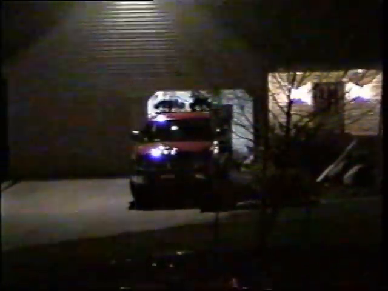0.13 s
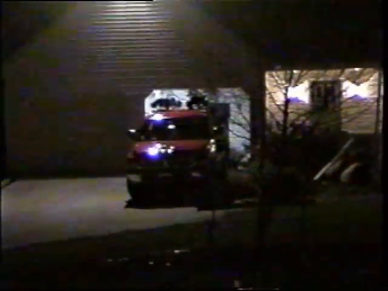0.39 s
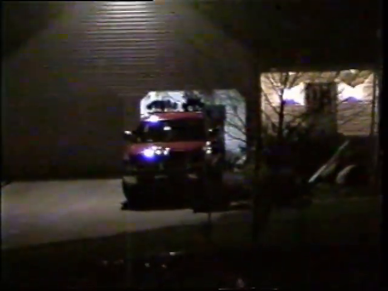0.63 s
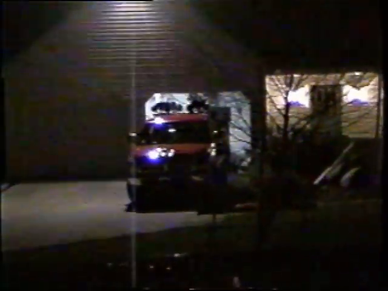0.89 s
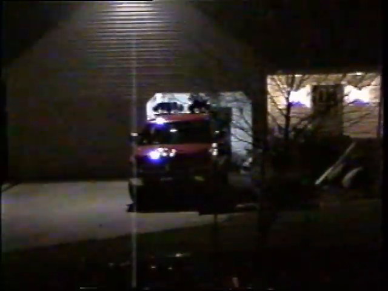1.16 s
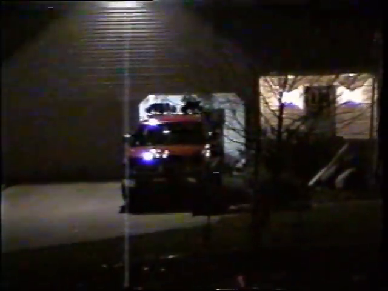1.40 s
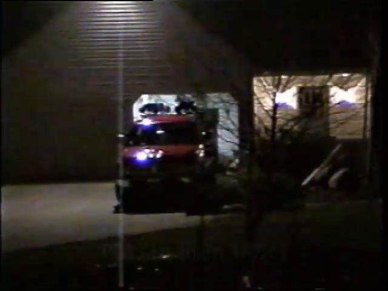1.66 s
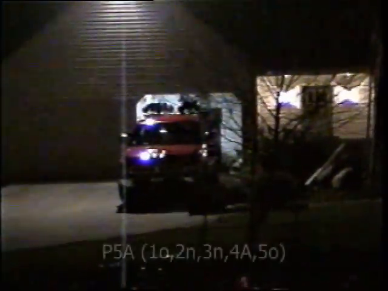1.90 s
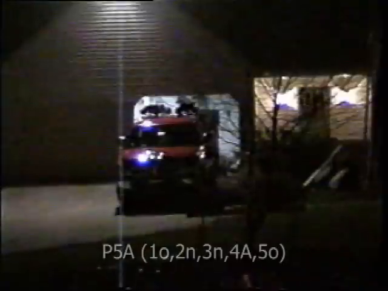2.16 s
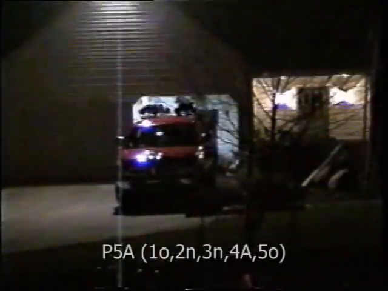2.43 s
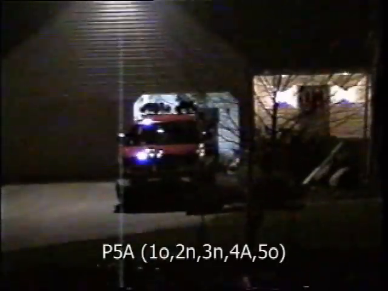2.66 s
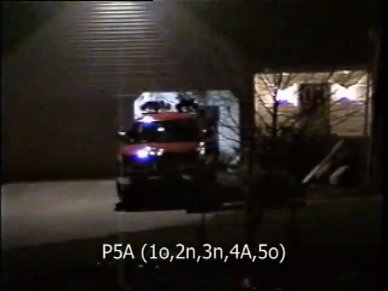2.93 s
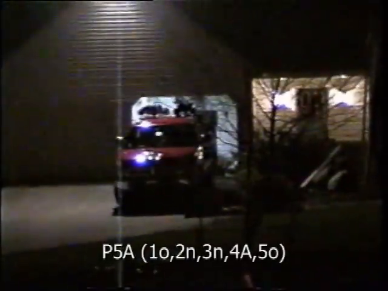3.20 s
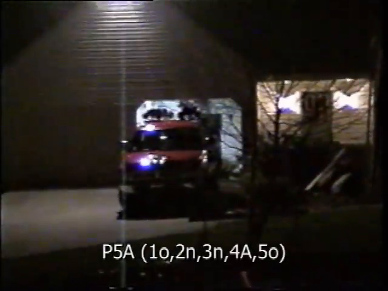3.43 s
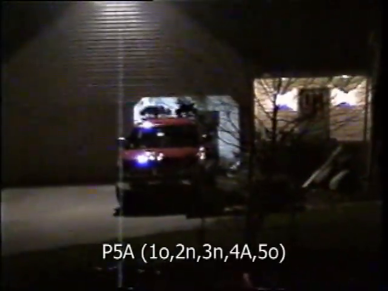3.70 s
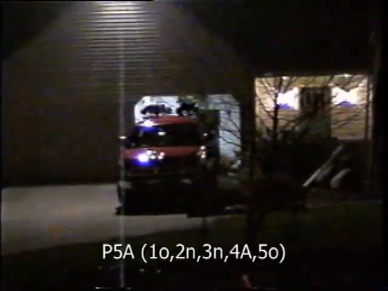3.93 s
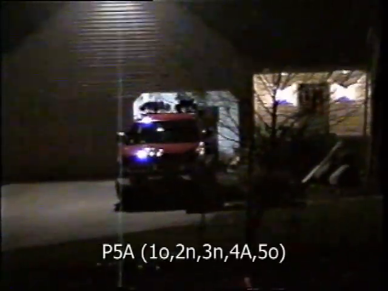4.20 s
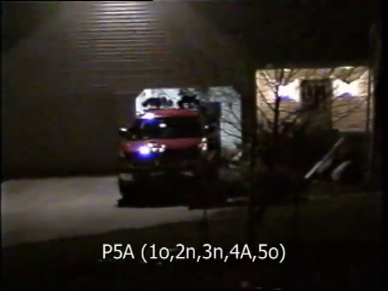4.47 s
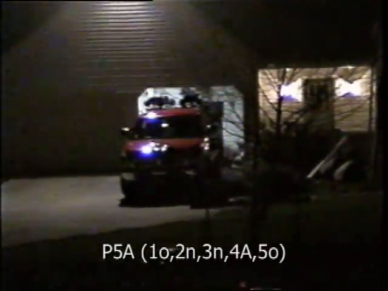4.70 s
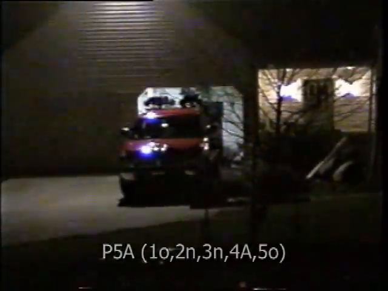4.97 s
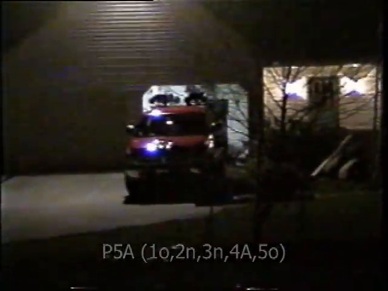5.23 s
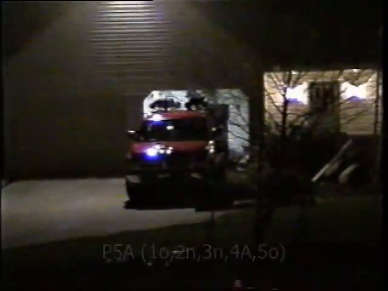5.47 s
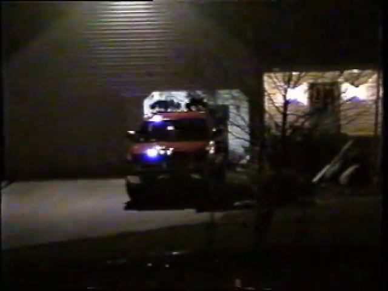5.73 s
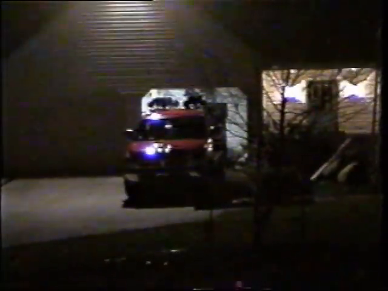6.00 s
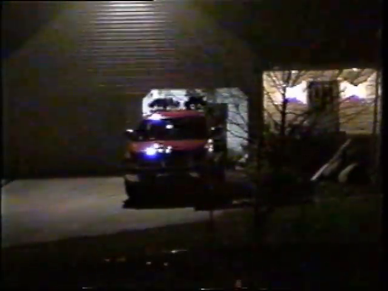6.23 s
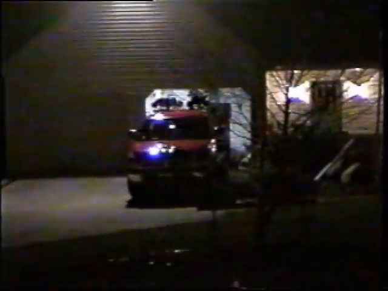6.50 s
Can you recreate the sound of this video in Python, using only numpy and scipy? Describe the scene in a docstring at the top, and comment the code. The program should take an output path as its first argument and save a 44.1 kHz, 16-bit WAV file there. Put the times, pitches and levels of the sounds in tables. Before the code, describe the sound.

Outdoors at night, a five-bell air horn blares from a pickup some distance from a tape camcorder. The opening chord grows from thin to full and cuts off quickly. Four more blasts follow: long, long, very short, long, each squeaking before the bells speak one after another. Faint diffuse echoes linger between them above hiss and hum. Tiny low thuds mark the squeals, and sharp tape clicks pepper the final blast, which continues to the end.

```python
"""A five-bell air horn on a parked pickup sounds five blasts, some way from a tape camcorder.
The first is under way and swells as its valve eases open; the last runs past the end.
Bells are sums of overtones plus sum tones and air rush; each later blast opens with a squeal of gliding tones.
Houses return a faint echo through sparse decaying taps. The tape adds hiss, hum, rumble, thuds, ticks, whine."""
import sys
import numpy as np
from scipy import signal
from scipy.fft import rfft, irfft, next_fast_len
from scipy.io import wavfile
from scipy.ndimage import uniform_filter1d

SR = 44100
rng = np.random.default_rng(int(sys.argv[2]) if len(sys.argv) > 2 else 0)


def inscribe(sig):
    """Save sig as 16-bit PCM at rate SR to the path in sys.argv[1].

    A 1-D sig is mono; a 2-D sig holds one channel per row.
    Samples are clipped to [-1, 1] before scaling.
    """
    pcm = np.round(np.clip(np.atleast_2d(sig).T, -1, 1) * 32767)
    wavfile.write(sys.argv[1], SR, pcm.astype(np.int16))


def amplitude_ratio(level_db):
    """Convert a level in decibels to the matching linear amplitude (field) ratio."""
    exponent = np.asarray(level_db, float) / 20
    return 10 ** exponent


N = 291942

# tape hiss spectrum: f/Hz, relative density/dB
HISS_SPECTRUM = [(25, -5.5), (80, -6), (200, -23), (1000, -10.5), (4000, -24), (9000, -24.5),
                 (13000, -23.5), (14500, -39), (15500, -45)]
# rumble spectrum: f/Hz, relative density/dB
RUMBLE_SPECTRUM = [(20, 1), (45, -13), (100, -5), (250, -31), (1000, -60)]
# head drum overtones 1, 2, ..: rms level before the expander/dB
HUM_OVERTONES = [-65.5, -78, -72, -78, -80, -75.5, -79, -78.5]
# loud head-switch pops: t/s, left height, right height, treble snap against pop/dB
LOUD_TICKS = [(3.9828, 0, .15, -4), (4.0498, 0, .018, 3), (4.2832, 0, .02, -2), (4.3165, -.02, 0, 1),
              (5.8516, -.13, .015, -3), (6.0348, -.07, .01, 5), (6.0849, -.015, .07, 0),
              (6.135, 0, .08, -6), (6.2014, 0, .05, -1), (6.2518, .14, -.02, -12), (6.3185, -.06, 0, -1),
              (6.3355, .065, 0, 2), (6.3689, .075, 0, -1), (6.5188, -.13, 0, -10)]
# stretch where every head switch pops faintly: from/s, to/s, rms height
NOISY_STRETCHES = [(5.98, 6.62, .012)]
# thud spectrum: f/Hz, relative density/dB
THUD_SPECTRUM = [(15, 0), (50, -2), (150, -14), (400, -40), (1000, -70)]
# echo decay: f/Hz, t60/s
ECHO_T60 = [(250, 4.5), (600, 4.2), (1200, 3.0), (2500, 1.81), (5000, 1.17), (10000, 1.5)]
# echo colour: f/Hz, relative level/dB
ECHO_COLOUR = [(250, 1), (600, 4), (1200, -4), (1900, 3), (2700, 0), (4000, 1.5), (8000, -5)]
# squeals: valve opens t/s, first chirp level/dB, chirp length/s, main swell level/dB, fundamental loudest after/s
SQUEAL_SHAPES = [(1.766, -18.5, .013, -19.5, .022), (3.247, -23, .026, -22, .034),
                 (4.725, -26.5, .021, -22.5, .01), (5.582, -30, .014, -19, .034)]
# bells: f/Hz, lag after valve opens/s, rise/s, pitch rise on thin air/thousandths,
# level change on thin air/dB, levels of overtones 1, 2, ../dB
BELL_VOICES = [(263.47, 0.0541, 0.043, 2.92, 6.5, [-42.5, -50, -35, -32.5, -38.5, -35.5, -48, -44.5, -43, -40, -48, -47.5, -50.5, -51, -46, -45.5, -48.5, -57]),
               (330.2, 0.0846, 0.081, 3.03, 2, [-38, -34.5, -34, -31.5, -38, -53, -45, -47.5, -49, -77, -56, -53, -45.5, -76, -55]),
               (389.6, 0.0586, 0.029, 6.5, -5.0, [-39, -32.5, -26.5, -34.5, -49, -56, -46.5, -54, -82, -64, -65, -78]),
               (453.5, 0.0512, 0.012, 7.5, -1.5, [-43, -28.5, -29.5, -44.5, -41, -42.5, -56, -45.5, -45, -70, -52]),
               (534.8, 0.0522, 0.027, 11.0, -1, [-37.5, -27.5, -31.5, -40, -45, -53.5, -49.5, -56.5, -59])]
# blasts: valve opens t/s, valve shuts t/s
BLAST_TIMES = [(-1, 0.995), (1.765, 2.615), (3.247, 3.96), (4.724, 4.885), (5.582, 7)]
# valve eased open in the first blast: t/s, thinness of the air (0-1), smallest bell level/dB
VALVE_EASING = [(0, 0.77, -31), (.2, 0.73, -32), (.26, 0.79, -5), (.36, 0.83, -8.5), (0.428, 0.61, 5.5),
                (0.548, 0.26, 3.2), (.68, 0.03, 0.3)]
# treble dips: base depth of each/dB
FLUTTER_DEPTHS = [-9, -22, -10, -6]
# overtones above the bell's own list, for a 264 Hz bell: f/Hz, level/dB
HIGH_OVERTONES = [(5000, -56), (7000, -56.5), (9000, -60.5), (12000, -75.5), (15000, -104)]
# air rush spectrum: f/Hz, relative density/dB
AIR_SPECTRUM = [(40, -11.5), (200, -25.5), (500, -21.5), (1100, -11), (2000, -22), (4000, -15.5),
                (8000, -34), (14000, -50.5)]
# sum tone colour: f/Hz, relative level/dB
SUM_COLOUR = [(200, -26), (600, -13), (1200, 5.5), (1600, 4.5), (2500, -6), (4000, 5), (7000, 5.5),
              (10000, -13), (14000, -51)]


def read(points, hz):
    """Value of a spectrum at hz, interpolated over log frequency."""
    f, value = np.transpose(points)
    return np.interp(np.log(hz + 1), np.log(f + 1), value)


def wander(size, hz):
    """Noise low-passed at hz, rms 1."""
    x = signal.lfilter([1], [1, -np.exp(-2 * np.pi * hz / SR)], rng.standard_normal(size))
    return x / x.std()


def coloured(points, channels):
    """Steady noise of a given spectrum, rms 1."""
    gain = amplitude_ratio(read(points, np.fft.rfftfreq(N, 1 / SR)))
    x = irfft(rfft(rng.standard_normal((channels, N))) * gain, N)
    return x / x.std()


def peaked(t, top_s, rise_s, fall_db_per_s):
    """Bell-shaped rise to a top of 1, then a steady fall in dB."""
    return np.where(t < top_s, np.exp(-((t - top_s) / rise_s) ** 2), amplitude_ratio(fall_db_per_s * (t - top_s)))


def tape_hiss():
    """Tape grain: noise mostly common to both tracks."""
    hiss = coloured(HISS_SPECTRUM, channels=3)
    return amplitude_ratio(-65) * (0.94 * hiss[0] + 0.31 * hiss[1:])


def drum_hum():
    """Overtones of the turning head drum, offset in phase between the tracks."""
    t = np.arange(N) / SR
    drum_hz, track_turns = 29.5, np.array([[.06], [-.06]])
    out = np.zeros((2, N))
    for k, db in enumerate(HUM_OVERTONES, 1):
        out += amplitude_ratio(db) * np.sin(2 * np.pi * (k * drum_hz * t + rng.random() + track_turns))
    return np.sqrt(2) * out


def tape_rumble():
    """Low noise, independent on the two tracks."""
    return amplitude_ratio(-79) * coloured(RUMBLE_SPECTRUM, channels=2)


def line_whine():
    """Picture line scan: a high tone of wavering level."""
    t = np.arange(N) / SR
    line_hz, level_db, waver_db = 15734, -84.5, 3.0
    return np.sqrt(2) * amplitude_ratio(level_db + waver_db * wander(N, hz=8)) * np.sin(2 * np.pi * line_hz * t)


def head_ticks():
    """A switch of tape heads jolts a track: a step that dies at once, with a snap on top."""
    field_s, field_start_s = 1001 / 60000, .0125
    pop_rise_s, pop_fall_s, faint_snap_db = .00006, .00023, 3
    fields = np.arange(field_start_s, N / SR, field_s)
    ticks = []
    for begin_s, end_s, height in NOISY_STRETCHES:
        for s, (left, right) in zip(fields, rng.standard_normal((len(fields), 2))):
            if begin_s < s < end_s:
                ticks.append((s, height * left, height * right, faint_snap_db))
    pops, snaps = np.zeros((2, 2, N))
    for s, left, right, snap_db in ticks + list(LOUD_TICKS):
        heights = np.array([left, right])
        pops[:, round(s * SR)] += heights
        snaps[:, round(s * SR)] += amplitude_ratio(snap_db) * heights
    t = np.arange(200) / SR
    jolt = np.exp(-t / pop_fall_s) - np.exp(-t / pop_rise_s)
    steps = signal.lfilter(jolt / jolt.max(), 1, pops)
    sagging = signal.lfilter(*signal.butter(1, 50, "high", fs=SR), steps)
    return sagging + signal.lfilter(*signal.butter(2, 7000, "high", fs=SR), snaps)


def thuds():
    """Short low noise bursts, opposite in sign left and right, at the start of every squeal."""
    t = np.arange(N) / SR
    level_db, rise_s, t60_s = -47.5, .006, .35
    shape = sum((t > s) * peaked(t, s + rise_s, rise_s, -60 / t60_s) for s, *_ in SQUEAL_SHAPES)
    low = coloured(THUD_SPECTRUM, channels=1)[0]
    return amplitude_ratio(level_db) * shape * low * np.array([[1.], [-1.]])


def houses(x):
    """Sparse echoes from far walls, building up late and dying band by band."""
    at = np.arange(2000, 3 * SR - 20, 20)
    taps = np.zeros(3 * SR)
    taps[at + rng.integers(0, 20, len(at))] = rng.choice([-1., 1.], len(at))
    hz, t, z = signal.stft(taps, SR, nperseg=256)
    decay_db = read(ECHO_COLOUR, hz)[:, None] - 60 * t / read(ECHO_T60, hz)[:, None]
    build_up = 1 - np.exp(-t / 0.2)
    tail = signal.istft(z * amplitude_ratio(decay_db) * build_up, SR, nperseg=256)[1]
    return signal.fftconvolve(x, tail / np.linalg.norm(tail))[:N]


def drifting_echo(sent):
    """Moving air keeps shifting the far paths: two echoes trade places at a wandering rate."""
    drift = 2 * np.pi * np.cumsum(0.7986 + 0.92 * wander(N, hz=2.44)) / SR
    return np.cos(drift) * houses(sent) + np.sin(drift) * houses(sent)


def ground(hz):
    """Direct sound and driveway bounce weaken each other at evenly spaced notches."""
    notch_spacing_hz, offset_spacings, share = 1483, .25, .6
    bounce = share * np.exp(2j * np.pi * (hz / notch_spacing_hz - offset_spacings))
    return abs(1 - bounce) / (1 + share)


def squeal(chirp_db, chirp_s, swell_db, fundamental_s):
    """First air whistles past the diaphragms, falters, swells again and thumps."""
    length_s, chirp_rise_s, pitch_hz = .13, .01, 1998.6
    t = np.arange(0, length_s, 1 / SR)
    jitter = 0.007 * uniform_filter1d(wander(len(t), hz=120), size=60)
    turn = 2 * np.pi * np.cumsum(pitch_hz * (1 + np.linspace(.004, -.006, len(t)) + jitter)) / SR
    start = np.sin(np.pi / 2 * np.minimum(t / chirp_rise_s, 1)) ** 2
    swell = amplitude_ratio(swell_db) * peaked(t, .051, .016, -240)
    # chirp and swell are out of step and cancel where they meet
    chirp = amplitude_ratio(chirp_db) * np.exp(-(t / chirp_s) ** 4)
    second = (swell - chirp) * amplitude_ratio(2.4 * uniform_filter1d(wander(len(t), hz=80), size=100))

    fundamental = amplitude_ratio(-34.5)
    bump = .12 + np.exp(-((t - fundamental_s) / .015) ** 2)
    first = fundamental * bump + amplitude_ratio(-20) * swell
    waver_db = 4 * uniform_filter1d(wander(len(t), hz=50), size=150)
    third = amplitude_ratio(-37.5 + waver_db) * peaked(t, .008, .008, -140)
    third *= .55 + .45 * first / fundamental  # odd overtones swell together
    upper = np.cos(3 * turn) + 0.11 * np.cos(4 * turn) + 0.03 * np.cos(5 * turn) + 0.025 * np.cos(6 * turn)
    neighbour = amplitude_ratio(-33) * peaked(t, .058, .014, -300) * np.cos(2 * np.pi * 2364 * t)
    tone = first * np.cos(turn) + second * np.cos(2 * turn) + third * upper + neighbour

    puff = amplitude_ratio(-24) * second * uniform_filter1d(wander(len(t), hz=2936), size=5)
    thump = amplitude_ratio(-42) * np.sin(2 * np.pi * 45 * t) * np.exp(-((t - .018) / .012) ** 2)
    return (np.sqrt(2) * tone + puff + thump) * start * np.minimum((length_s - t) / .01, 1)


def squeals():
    """One squeal as the valve opens for each blast after the first."""
    out = np.zeros(N)
    for opens_s, *shape in SQUEAL_SHAPES:
        one = squeal(*shape)
        begin = round((opens_s - .01 / 3) * SR)  # a third of the chirp rise early
        out[begin:begin + len(one)] += one
    return out


def bell(hz, overtones_db, sharp, bite, crisp):
    """A diaphragm beating its seat: low overtones shaped by the bell, high ones bunched into a snap a cycle."""
    n = len(sharp)
    pitch_hz = hz * (1 + sharp + 0.0004 * wander(n, hz=25.3))
    beat = np.exp(2j * np.pi * (np.cumsum(pitch_hz) / SR + rng.random()))
    body, edge, snap = np.zeros((3, n), complex)
    overtone = np.ones(n, complex)
    for k in range(1, int(14000 / hz)):
        f = k * hz
        overtone = overtone * beat
        listed = k <= len(overtones_db)
        high_db = read(HIGH_OVERTONES, f) - 12.0 * np.log2(hz / 264) + 2.0 * rng.standard_normal()
        size = amplitude_ratio(overtones_db[k - 1]) if listed else amplitude_ratio(high_db) * ground(f)
        size = size * np.exp(1j * rng.normal(0, 0.22 + (2200 / f) ** 2))
        share = np.clip((f - 1000) / 700, 0, 1)  # thin air dulls the treble first
        body += (1 - share) * size * overtone
        if listed:
            edge += share * size * overtone
        else:
            snap += size * overtone
    # no two snaps are alike
    snap *= crisp * (0.95 + .6 * uniform_filter1d(wander(n, hz=150), size=60))
    return np.sqrt(2) * (body + bite * (edge + snap)).real


def sum_tones(sounds):
    """So loud a chord steepens in the air: products of unlike bells, coloured by ground and air."""
    chord = sum(sounds)
    mixed = chord ** 2 - sum(one ** 2 for one in sounds)
    size = next_fast_len(len(chord) + 4096)
    hz = np.fft.rfftfreq(size, 1 / SR)
    gain = amplitude_ratio(10.5 + read(SUM_COLOUR, hz)) * ground(hz)
    return irfft(1j * rfft(mixed, size) * gain, size)[:len(chord)]


def air_rush(air, chord, thin):
    """Air noise in the bells, following the chord's short-time level."""
    envelope = np.sqrt(abs(uniform_filter1d(chord ** 2, 600))) / 0.062
    return amplitude_ratio(-47 - 3.6 * thin) * air * envelope


def flutter(t):
    """Treble dips at a steady pace near the start, in dB."""
    first_s, every_s, width_s = .017, .132, .019
    return sum(db * np.exp(-((t - first_s - k * every_s) / width_s) ** 2)
               for k, db in enumerate(FLUTTER_DEPTHS))


def horn():
    """Bells speak one after another, sharp and loud at first, and die as the line empties."""
    out, air = np.zeros(N), coloured(AIR_SPECTRUM, channels=1)[0]
    easing_s, thinness, smallest_db = np.transpose(VALVE_EASING)
    for opens_s, shuts_s in BLAST_TIMES:
        at = np.arange(max(round(opens_s * SR), 0), min(round((shuts_s + .25) * SR), N))
        t = at / SR
        thin = np.interp(t, easing_s, thinness)
        emptying_s = np.maximum(t - shuts_s, 0)
        flutter_db = flutter(t)
        bite = amplitude_ratio(-8.5 * thin + 0.42 * flutter_db - 263 * emptying_s)
        sounds = []
        for hz, lag_s, rise_s, sharp, thin_db, overtones_db in BELL_VOICES:
            age_s = np.maximum(t - opens_s - lag_s, 0)
            glide = .6 * rise_s * np.exp(-age_s / 0.0406) + .002 * np.exp(-age_s / .2)
            level = np.sin(np.pi / 2 * np.minimum(age_s / rise_s, 1)) ** 2
            level *= 1 + .3 * np.exp(-age_s / 0.09)
            level *= amplitude_ratio(thin_db * thin + 0.18 * flutter_db - 233 * emptying_s)
            sounds.append(level * bell(hz, overtones_db, glide + sharp * thin / 1000, bite, amplitude_ratio(flutter_db)))
        sounds[-1] *= amplitude_ratio(np.interp(t, easing_s, smallest_db))
        chord = sum(sounds)
        out[at] += chord + sum_tones(sounds) + air_rush(air[at], chord, thin)
    return out


def scene():
    """Horn, squeals and echo reach both ports alike, one port a trace duller and later."""
    chord, whistle = horn(), squeals()
    mid = chord + whistle + amplitude_ratio(-31) * drifting_echo(chord + 0.29 * whistle)
    return np.array([mid * amplitude_ratio(-0.18), (0.95 * mid + 0.059 * np.roll(mid, 1)) * amplitude_ratio(0.63)])


def quietness(x):
    """Level detector, 0 loud to 1 quiet: jumps up at once, lets go at a steady rate."""
    fall_db = 140 * np.arange(N) / SR  # dB a second
    power_db = 10 * np.log10(abs(uniform_filter1d((x ** 2).mean(0), 400)) + 1e-12)
    held_db = np.maximum.accumulate(power_db + fall_db) - fall_db
    return uniform_filter1d(np.clip((-30 - held_db) / 14, 0, 1), 400)


def low_pass(x):
    """Removes everything above the highest recorded frequency."""
    return signal.sosfilt(signal.butter(12, 15820, fs=SR, output="sos"), x)


def record(dry):
    """Peaks round off, gain control lifts quiet passages; hum and rumble swell with the level."""
    noisy = dry + tape_hiss()
    quiet = quietness(noisy)
    swell = amplitude_ratio(10.4 * (1 - quiet))  # the playback expander opens with the level
    tape = .5 * np.tanh(noisy / .5) * amplitude_ratio(4.1 * quiet)
    tape = tape + swell * (drum_hum() + tape_rumble())
    tape = tape + thuds() + head_ticks() + line_whine()
    return low_pass(tape)


dry = scene()
out = record(dry)
inscribe(out)
```